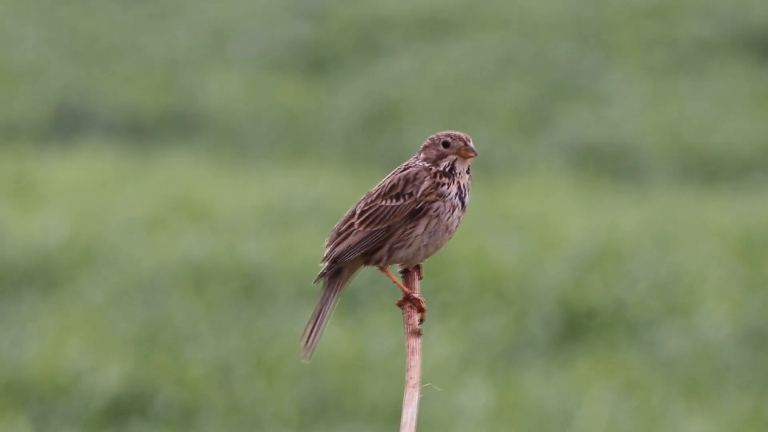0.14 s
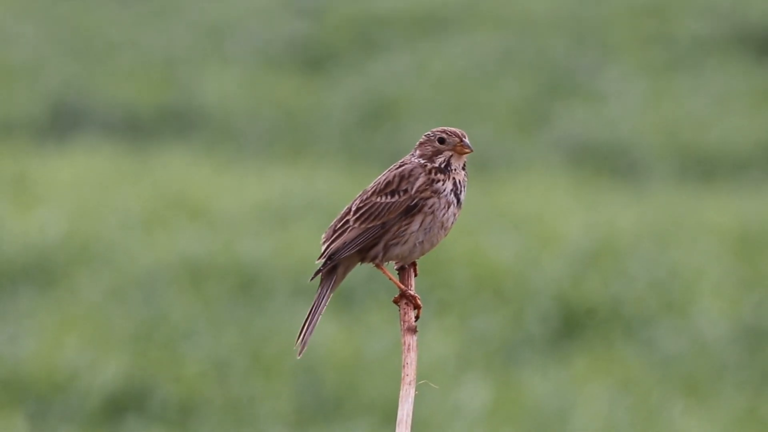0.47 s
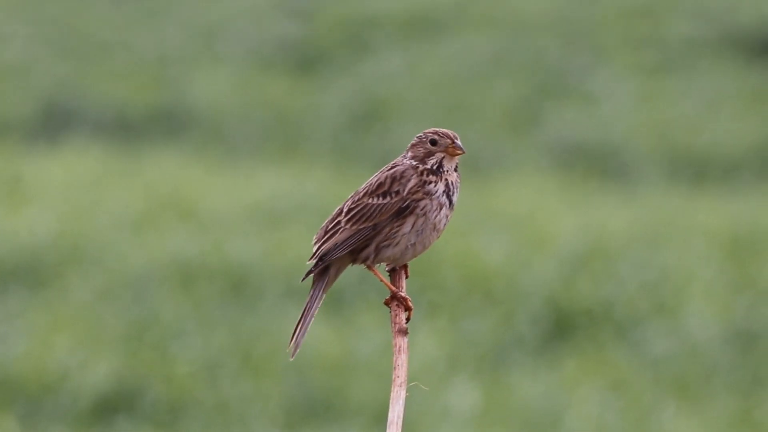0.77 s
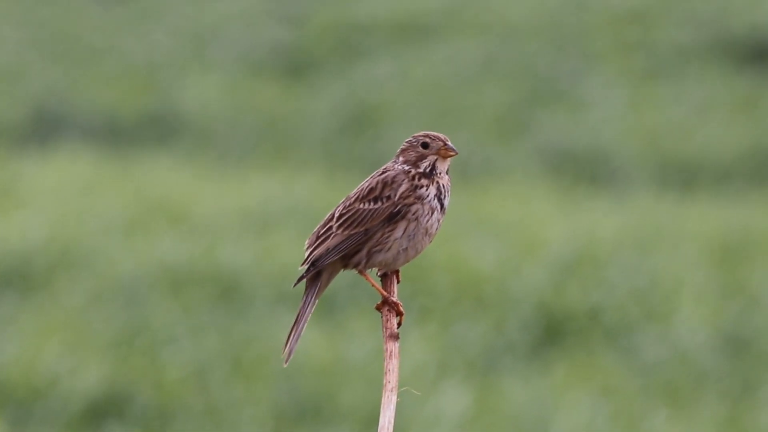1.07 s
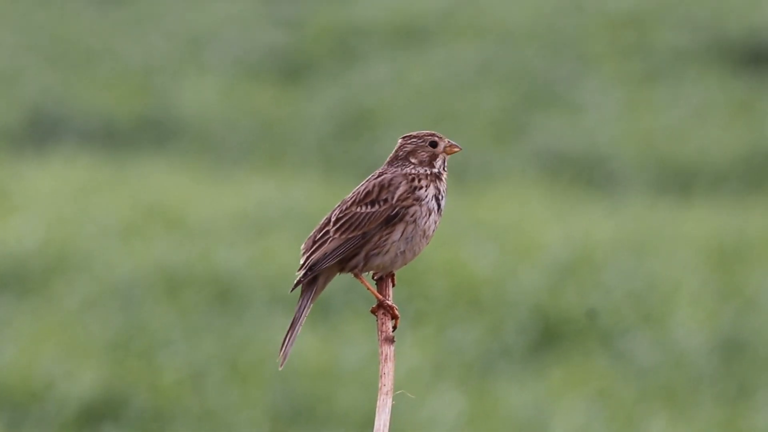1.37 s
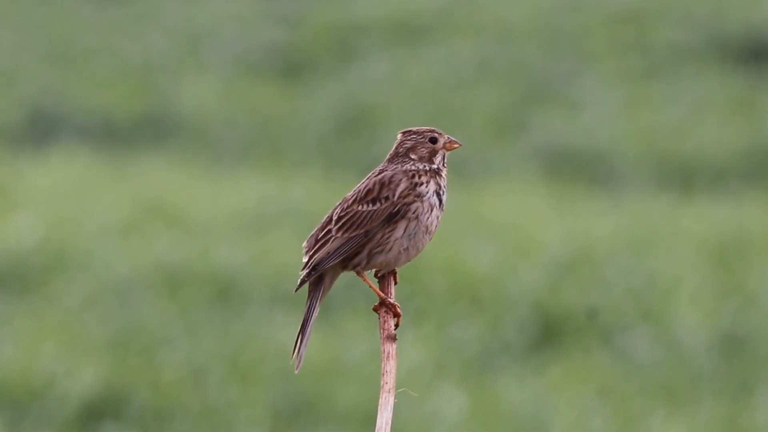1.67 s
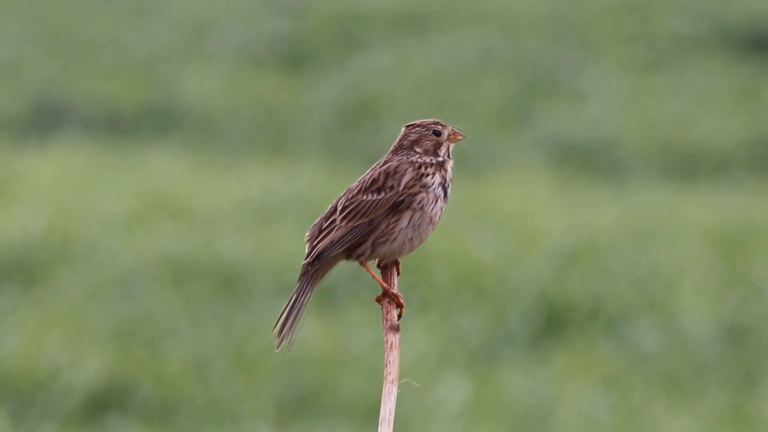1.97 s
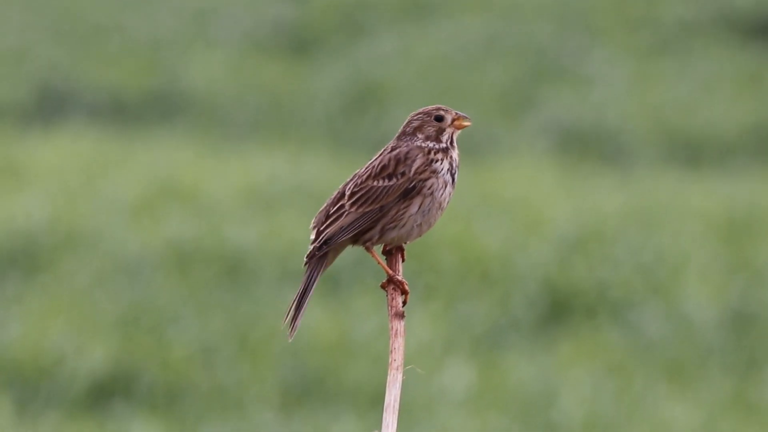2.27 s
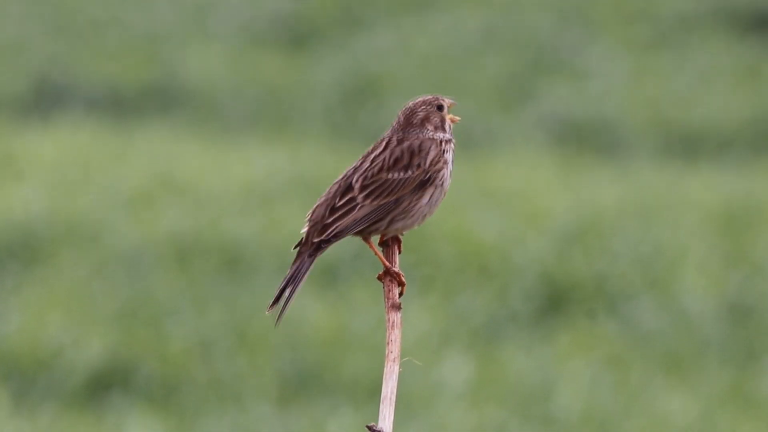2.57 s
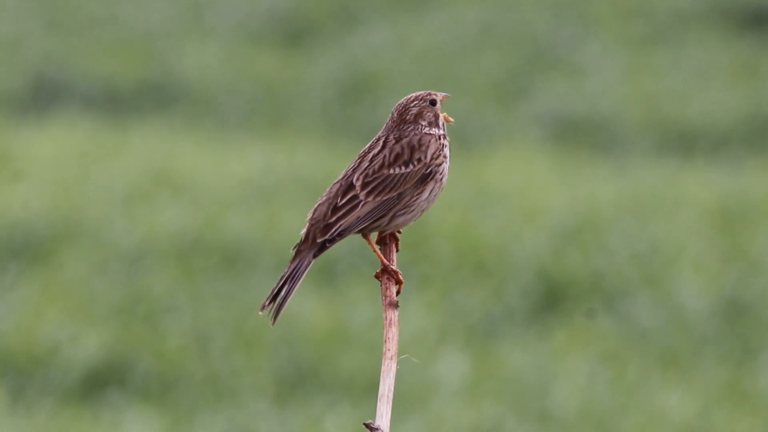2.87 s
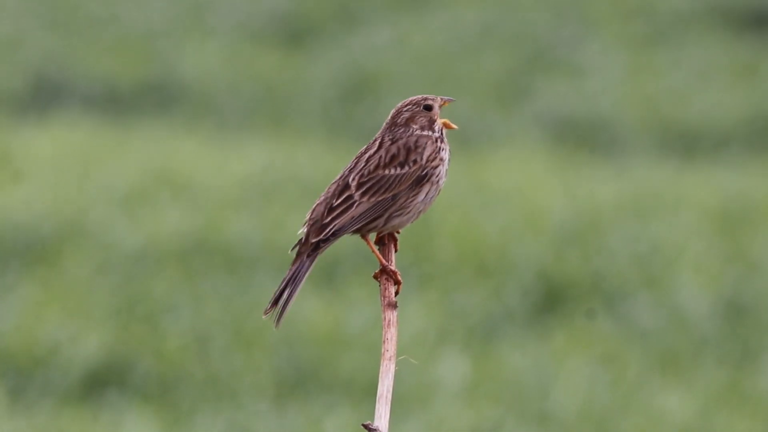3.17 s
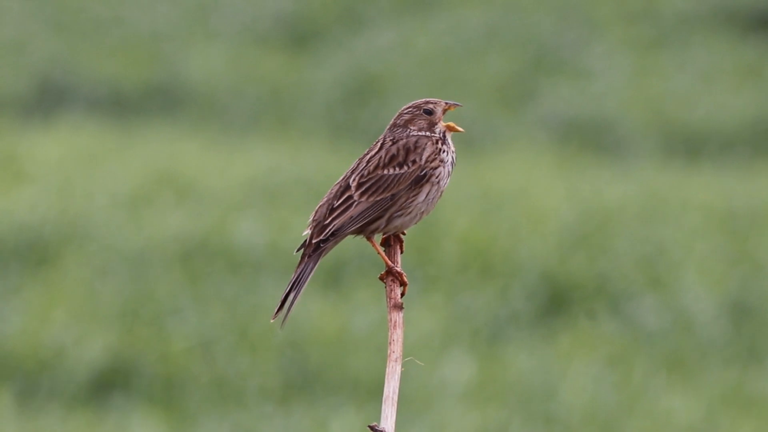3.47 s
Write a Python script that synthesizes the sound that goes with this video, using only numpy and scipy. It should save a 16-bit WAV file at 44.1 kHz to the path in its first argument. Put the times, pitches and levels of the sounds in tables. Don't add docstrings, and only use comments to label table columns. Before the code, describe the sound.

A small bird ticks faster and faster into a bright jangling trill beside an idling car.

```python
import sys
import numpy as np
from scipy import signal
from scipy.fft import rfft, irfft
from scipy.io import wavfile
from scipy.ndimage import uniform_filter1d

SR = 44100
rng = np.random.default_rng(int(sys.argv[2]) if len(sys.argv) > 2 else 0)


def nominal_scale(level):
    x = np.asarray(level, float) / 20
    return 10 ** x


def pcm_store(signal):
    levels = np.round(np.clip(np.atleast_2d(signal), -1, 1) * 32767)
    wavfile.write(sys.argv[1], SR, levels.astype(np.int16).T)


N = 159642


def level(x, db):
    return x * nominal_scale(db) / np.sqrt(np.mean(x ** 2))


def walk(rate):
    k = int(SR / rate)
    steps = np.repeat(rng.standard_normal(N // k + 1), k)
    return 1.326 * uniform_filter1d(uniform_filter1d(steps, k), k)[:N]


def pan(x, db):
    return x * nominal_scale(np.array([[db / 2], [-db / 2]]))


def add(out, at_s, x):
    i = int(at_s * SR)
    out[i:i + len(x)] += x[:len(out) - i]


def filtered(x, order, hz, kind):
    return signal.sosfilt(signal.butter(order, hz, kind, fs=SR, output="sos"), x)


def curve(f, shape, **ends):
    hz, db = np.transpose(shape)
    return nominal_scale(np.interp(np.log(f), np.log(hz), db, **ends))


def bands(shape, same, flicker_db):
    f = np.arange(N // 2 + 1) * SR / N + 1
    gain = curve(f, shape, left=-80, right=-80)
    mid = rfft(rng.standard_normal(N)) * gain
    side = rfft(rng.standard_normal(N)) * gain
    likeness = np.clip(same(f), 0, 1)
    mid = np.sqrt(1 + likeness) * mid
    side = np.sqrt(1 - likeness) * side
    both = np.array([mid + side, mid - side])
    out = 0
    for k in range(19):
        part = np.clip(1 - abs(2 * np.log2(f / 35) - k), 0, 1)
        out = out + irfft(both * part, N) * nominal_scale(flicker_db * walk(9.05))
    return out


# pitch in Hz, strength in dB per Hz.
AIR_TONE = [(40, -24), (110, -16), (240, -17), (360, -13), (520, -21.5), (1500, -26.5), (4000, -37),
            (16000, -51.5)]


def air():
    noise = bands(AIR_TONE, lambda f: 1.14 / (1 + (f / 460) ** 2), flicker_db=0.67)
    return pan(level(noise, -49.5), 5)


# pitch in Hz, strength in dB per Hz.
ROAD_TONE = [(500, 8), (720, 10), (920, 15.5), (1150, 7.5), (1620, 0.5), (2100, -7.5), (2600, -7.5),
             (3500, -15)]
# time in seconds, level in dB.
ROAD_FADE = [
    (0, -42.5),
    (1.3, -50.5),
    (2.3, -53),
    (3.62, -61.5),
]


def road():
    road_db = np.interp(np.arange(N) / SR, *np.array(ROAD_FADE).T)
    noise = bands(ROAD_TONE, lambda f: 1 / (1 + (f / 1560) ** 2), flicker_db=0.46)
    left, right = level(noise, 0) * nominal_scale(road_db)
    lag_s = 0.000088
    return pan(np.array([np.roll(left, int(lag_s * SR)), right]), 3.5)


# middle in seconds, level in dB, pitch in Hz.
WIND_NUDGES = [
    (0.91, -33.5, 115),
    (0.948, -38, 54.7),
    (1.161, -42, 110),
]


def gusts():
    out = np.zeros(N)
    for s, db, hz in WIND_NUDGES:
        half_s = 0.83 / hz
        t = np.arange(-half_s, half_s, 1 / SR)
        fade = np.cos(np.pi * t / half_s / 2) ** 2
        add(out, s - half_s, -nominal_scale(db) * np.cos(2 * np.pi * hz * t) * fade)
    return out


# multiple of the idle rate, level in dB.
ENGINE_HUM = [(1, -53.5), (2, -48), (3, -54), (4, -62), (5, -60.5), (7.4, -59.5), (11, -63), (12.5, -60.5),
              (20, -66.5), (33, -65.5), (64, -70)]


def engine():
    idle_hz = 27.65
    phase = 2 * np.pi * np.cumsum(idle_hz * (1 + 0.003935 * walk(1.5))) / SR
    out = np.zeros(N)
    for k, db in ENGINE_HUM:
        wander_db = 0.2 * k ** 0.51 * walk(5.76)
        start = 2 * np.pi * rng.random()
        out += np.sqrt(2) * nominal_scale(db + wander_db) * np.sin(k * phase + start)
    return out


RELAY_TIMES = [
    0.2264,
    0.6301,
    1.0293,
    1.4299,
    1.8258,
    2.2253,
    2.6285,
    3.0323,
    3.428,
]
# pitch in Hz, level in dB, time to fall 60 dB in seconds.
TICK_RINGS = [(407.4, -41.5, 0.11), (2596, -49, 0.061), (3720, -50.5, 0.083), (4750, -45, 0.015),
              (5200, -56.5, 0.016), (5350, -77, 0.005)]
# pitch in Hz, level in dB, time to fall 60 dB in seconds.
TOCK_RINGS = [(390, -44, 0.092), (1690, -47, 0.039), (4330, -44.5, 0.015), (4800, -39, 0.013),
              (5100, -58, 0.023), (7890, -47.5, 0.0087)]
# delay in seconds, level in dB.
CLOSING_BOUNCES = [
    (0, -4.5),
    (.002, 0),
    (.0032, -7),
    (.0045, -3.5),
]
# delay in seconds, level in dB.
OPENING_BOUNCES = [
    (.0013, -1),
    (.0035, 0),
    (.0065, -4),
]


def relay():
    out, t = np.zeros(N), np.arange(int(0.08 * SR)) / SR
    tick = (TICK_RINGS, CLOSING_BOUNCES, (2400, 7260), -38)
    tock = (TOCK_RINGS, OPENING_BOUNCES, (3900, 5000), -34)
    rattle_t60_s = 0.027
    for k, s in enumerate(RELAY_TIMES):
        rings, bounces, rattle_hz, rattle_db = (tick, tock)[k % 2]
        ring = np.zeros(len(t))
        for hz, db, t60_s in rings:
            ring += nominal_scale(db) * np.sin(2 * np.pi * hz * t) * 1000. ** (-t / t60_s)
        for lag_s, db in bounces:
            rattle = filtered(rng.standard_normal(len(t)), 3, rattle_hz, "band")
            rattle = rattle * 1000. ** (-t / rattle_t60_s)
            add(out, s + lag_s, nominal_scale(db) * (ring + nominal_scale(rattle_db) * rattle))
    return filtered(out, 4, 8600, "low")


def tone(hz, env, octave=0, third=0):
    p = 2 * np.pi * np.cumsum(hz) / SR + 2 * np.pi * rng.random()
    return env * (np.sin(p) + octave * np.sin(2 * p) + third * np.sin(3 * p))


def glide(length_s, from_hz, to_hz, db, swell=1, bend=1.7):
    u = np.linspace(0, 1, int(length_s * SR))
    travel = np.expm1(-bend * u) / np.expm1(-bend)
    return tone(from_hz + (to_hz - from_hz) * travel, nominal_scale(db) * np.sin(np.pi * u ** swell))


# start in seconds, level in dB, snap length in seconds,
# whistle pitch in Hz, whistle length in seconds.
SONG_TICKS = [
    (2.111, -43.5, 0.0069, 3210, 0.016),
    (2.335, -29.5, 0.008, 3340, .024),
    (2.509, -25.5, 0.0079, 3320, 0.027),
    (2.657, -26, 0.0079, 3350, 0.029),
    (2.797, -30, 0.007, 3750, 0.026),
    (2.845, -30, 0.0073, 3820, 0.027),
    (2.892, -29, 0.0057, 3880, 0.023),
    (2.936, -28.5, 0.0071, 4000, 0.02),
]


def ticks():
    out = np.zeros(N)
    for k, (s, db, snap_s, hz, whistle_s) in enumerate(SONG_TICKS):
        if k < 4:
            snap_to_hz, snap_bend, pre_at, dip_db, late_s = 6200, -1.1, 0.35, -6.5, 0.0035
        else:
            snap_to_hz, snap_bend, pre_at, dip_db, late_s = 4580, -2.6, 0.15, -2, 0
        add(out, s, glide(snap_s, 8080, snap_to_hz, db, swell=1.48, bend=snap_bend))
        add(out, s + pre_at * snap_s, glide(0.0049, 4480, 5500, db - 7))
        add(out, s + 0.73 * snap_s, glide(0.0035, 4480, 5500, db + dip_db, bend=0.28))

        t = np.arange(int(whistle_s * SR)) / SR
        u = t / whistle_s
        fade_in = np.clip(u / 0.46, 0, 1) ** 1.02
        fade_out = np.clip((1 - u) / 0.23, 0, 1)
        env = nominal_scale(-41 + 0.28 * min(db + 30, 0)) * fade_in * fade_out
        octave = nominal_scale(15 - 22 * np.clip(u / 0.48, 0, 1))
        pitch = hz * (1 - 0.32 * np.exp(-t / 0.00503))
        add(out, s + 0.0095 + late_s, tone(pitch, env, octave, nominal_scale(-23)))
    return out


def trill():
    start_s, end_s, beat_s, beat_at_s = 3.047, 3.184, 0.01235, 3.0912
    trill_db, flick_s, flick_db = -33, 0.0047, -34
    out, t = np.zeros(N), np.arange(start_s, end_s, 1 / SR)
    beat = (t - beat_at_s) / beat_s % 1
    bump = uniform_filter1d(np.exp(-beat / 0.12) + np.exp((beat - 1) / 0.098), size=30)
    hz = 4650 + 580 * np.exp(-(t - start_s) / 0.04) + 604 * bump
    edge = np.clip(np.minimum(t - start_s, end_s - t) / 0.0039, 0, 1)
    add(out, start_s, tone(hz, nominal_scale(trill_db + 0.94 * walk(152)[:len(t)]) * edge))
    for k in range(-3, 8):
        vary = rng.standard_normal(2)
        s = beat_at_s + k * beat_s - 0.5 * flick_s
        add(out, s, glide(flick_s, 7200 + 150 * vary[0], 5300, flick_db + 1.3 * vary[1], swell=0.98))
        add(out, s - 0.0024, glide(0.0057, 6650, 4900, flick_db - 0.5 - 1.5 * vary[1]))
    return out


# first pip in seconds, spacing in seconds, upper voice in dB, lower voice in dB.
PIP_RUNS = [
    (3.1998, 0.0059, -35, -37.5),
    (3.289, 0.0065, -32, -32),
    (3.413, .0044, -33.5, -33),
]
RUN_COUNTS = 5, 4, 6
# start in seconds, length in seconds, from Hz, to Hz, level in dB.
UPPER_NOTES = [(2.978, 0.0077, 7100, 8050, -31), (2.998, 0.012, 6800, 7520, -30),
               (2.973, 0.0031, 6800, 8000, -38), (3.0154, 0.0059, 7000, 8190, -30),
               (3.026, 0.0078, 7000, 8000, -30), (3.1888, 0.0078, 7500, 7350, -32),
               (3.248, 0.01, 6900, 7900, -34), (3.265, 0.0079, 7040, 7400, -32),
               (3.313, 0.009, 6770, 8130, -30.5), (3.367, 0.0092, 7040, 7830, -32),
               (3.379, 0.0106, 7200, 7900, -31), (3.403, 0.0054, 7200, 7600, -30),
               (3.439, 0.0077, 6300, 8000, -30), (3.466, 0.013, 6650, 7120, -28.5),
               (3.4734, 0.0063, 7100, 8540, -31), (3.494, 0.0078, 6770, 7400, -32),
               (3.503, 0.006, 7100, 8100, -31), (3.51, 0.0076, 7250, 7940, -31),
               (3.518, 0.006, 7250, 8000, -33), (3.54, 0.0074, 7000, 8200, -40),
               (3.5818, 0.01, 7150, 8050, -28.5), (3.595, 0.0069, 7500, 7890, -28),
               (3.6066, 0.0078, 7300, 7850, -26.5), (3.617, 0.008, 6800, 7800, -26),
               (3.5243, 0.0037, 5200, 8240, -27.5), (3.3135, 0.0035, 5000, 7300, -42),
               (3.275, 0.012, 5200, 6520, -33), (3.227, 0.0053, 4900, 5900, -40)]
# start in seconds, length in seconds, from
# Hz, to Hz, level in dB.
LOWER_GLIDES = [(3.2805, 0.0082, 6330, 5230, -25), (3.317, 0.0055, 7060, 5070, -28.5),
                (3.3488, 0.011, 6570, 5160, -23), (3.36, 0.0031, 7300, 5000, -25.5),
                (3.361, 0.0072, 6750, 5120, -24), (3.396, 0.0049, 6430, 5200, -30),
                (3.406, 0.006, 6460, 5100, -28.5), (3.443, 0.0053, 7180, 4820, -26.5),
                (3.4718, 0.0064, 7230, 5170, -29), (3.51, 0.0054, 6360, 5200, -32),
                (3.5252, 0.0089, 7580, 5310, -27.5), (3.537, 0.0108, 6920, 5230, -26),
                (3.606, 0.0075, 7200, 5050, -33.5), (2.9767, 0.003, 4860, 8100, -29.5),
                (3.263, 0.01, 6400, 5000, -37), (3.392, 0.004, 7400, 5200, -34),
                (3.458, 0.005, 6530, 5000, -30),
                (3.013, 0.0059, 5930, 5350, -33.5), (3.2324, 0.0076, 6470, 5200, -32),
               (3.2416, 0.0066, 6730, 5200, -26.5), (3.249, 0.0078, 5150, 5220, -32.5),
               (3.002, 0.0057, 5800, 5200, -39), (3.332, 0.027, 6500, 5900, -34),
               (3.33, 0.03, 5300, 5110, -39), (3.341, 0.014, 7170, 6400, -35),
               (3.403, 0.0063, 5000, 5550, -40), (3.3673, 0.0085, 5020, 5530, -30.5),
               (3.384, 0.0052, 6070, 5420, -33), (3.441, 0.0036, 5570, 5400, -27),
               (3.452, 0.0038, 6160, 6200, -28), (3.453, 0.012, 5100, 5620, -28.5),
               (3.455, 0.0045, 6330, 6350, -24.5), (3.504, 0.0077, 6350, 5400, -32),
               (3.5175, 0.007, 6400, 5420, -31), (3.535, 0.0059, 5830, 7160, -30)]
# start in seconds, from Hz, to Hz, level in dB.
GRACE_NOTES = [
    (3.0045, 6800, 8300, -33),
    (3.0245, 5900, 7000, -36),
    (3.0262, 5900, 5500, -33),
    (3.1885, 5500, 5100, -34),
    (3.192, 5200, 5100, -36),
    (3.239, 7200, 4900, -33),
    (3.267, 7200, 8600, -35),
    (3.2835, 7300, 6000, -32),
    (3.497, 6500, 5300, -35),
]


def jangle():
    out, swell = np.zeros(N), 0.7
    for (first_s, gap_s, upper_db, lower_db), count in zip(PIP_RUNS, RUN_COUNTS):
        for k in range(count):
            high, low = 1 + 0.0096 * rng.standard_normal(2)
            s, pip_s, grow_db = first_s + k * gap_s, 0.73 * gap_s, 0.54 * k
            add(out, s, glide(pip_s, 6550 * high, 8180 * high, upper_db + grow_db, swell))
            add(out, s, glide(pip_s, 4980 * low, 5550 * low, lower_db + grow_db))
    for s, length_s, from_hz, to_hz, db in UPPER_NOTES:
        add(out, s, glide(length_s, from_hz, to_hz, db, 1.35))
    for s, length_s, from_hz, to_hz, db in LOWER_GLIDES:
        add(out, s, glide(length_s, from_hz, to_hz, db, swell))
    for s, from_hz, to_hz, db in GRACE_NOTES:
        add(out, s, glide(0.0036, from_hz, to_hz, db))
    return out


# pitch in Hz, gain in dB.
BEAK_TONE = [(4000, -1), (5400, -1.5), (6700, 0), (7800, 0), (8600, 2), (10000, 3)]


def beak(x):
    f = np.arange(N // 2 + 1) * SR / N + 1
    return irfft(rfft(x) * curve(f, BEAK_TONE), N)


def echoes(song):
    t = np.arange(int(0.3 * SR)) / SR
    t60_s = 0.13
    tail = rng.standard_normal((2, len(t))) * 1000. ** (-t / t60_s) * np.clip(t / 0.0029, 0, 1)
    tail = filtered(tail, 2, 5000, "high")
    tail = tail / np.sqrt(np.sum(tail[0] ** 2))
    return nominal_scale(-9) * signal.fftconvolve(song[None], tail, axes=1)[:, :N]


def bird():
    song = beak(ticks() + trill() + jangle()) * (1 + 0.13 * walk(2500))
    size = abs(signal.hilbert(song))
    loud = uniform_filter1d(size, size=600) + 0.00059
    mixed = nominal_scale(-22) * song ** 2 / loud + nominal_scale(-20.5) * song ** 3 / loud ** 2
    breath = nominal_scale(-32) * size * rng.standard_normal(N)
    song = song + filtered(mixed + breath, 4, 11000, "high")
    return pan(song + echoes(song), 4.5)


def scene():
    car = pan(gusts() + engine() + relay(), 5.6)
    return air() + road() + car + bird()


def roll_off(x):
    return signal.sosfilt(signal.butter(12, 16030, fs=SR, output="sos"), x)


def record(dry):
    top_cut = signal.ellip(10, 0.2, 90, 15800, fs=SR, output="sos")
    return roll_off(signal.sosfilt(top_cut, dry))


dry = scene()
out = record(dry)
pcm_store(out)
```